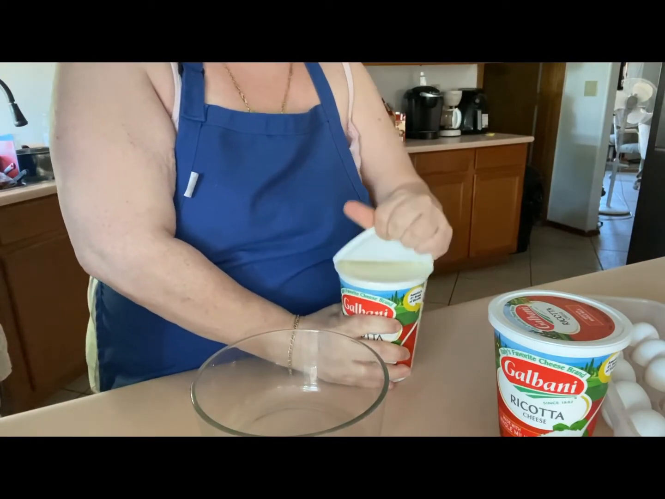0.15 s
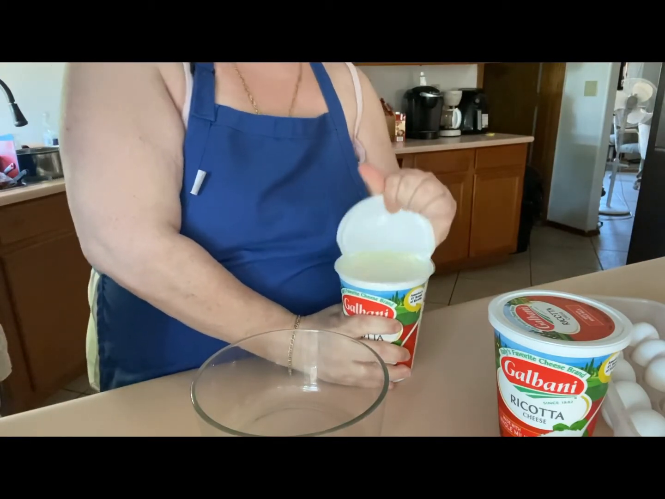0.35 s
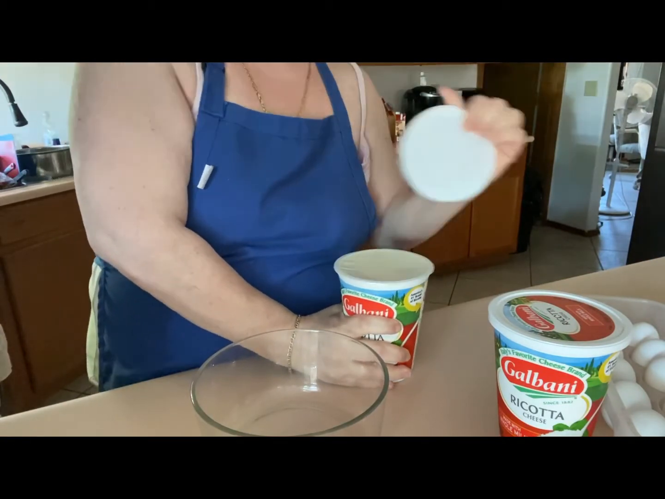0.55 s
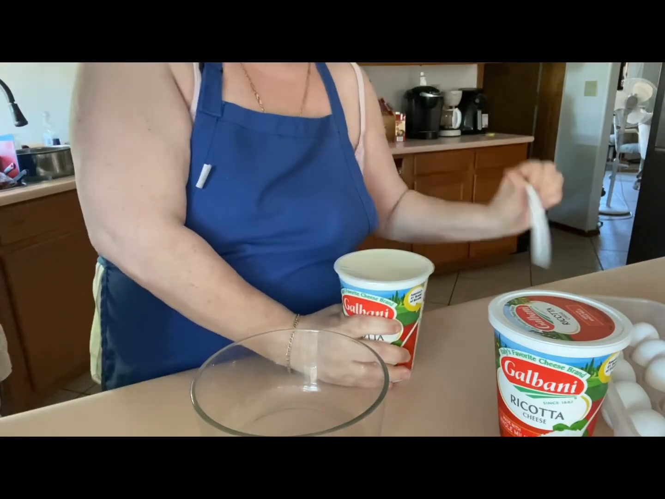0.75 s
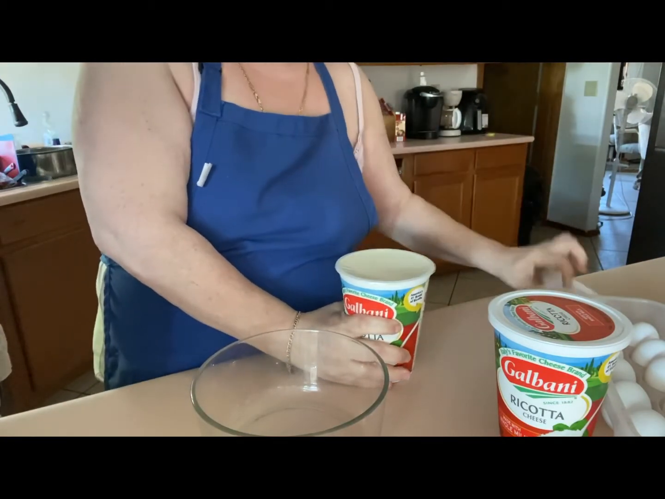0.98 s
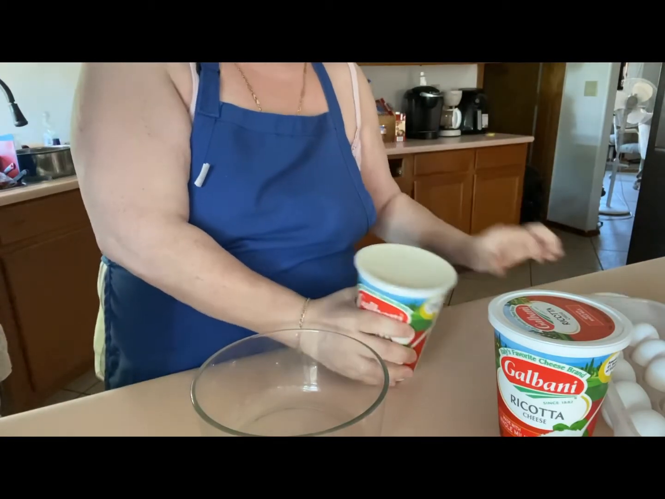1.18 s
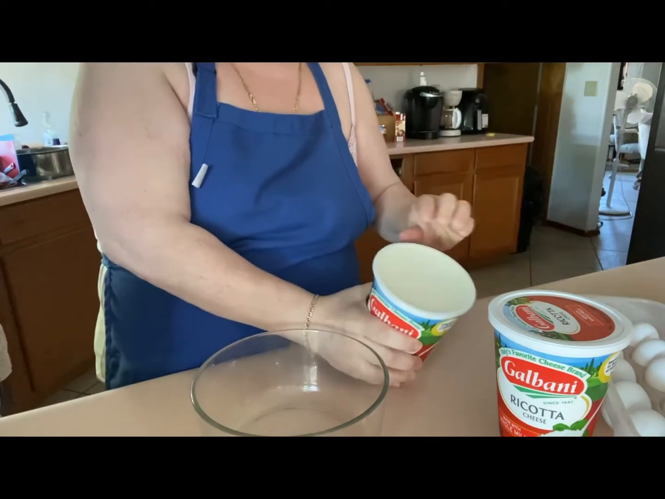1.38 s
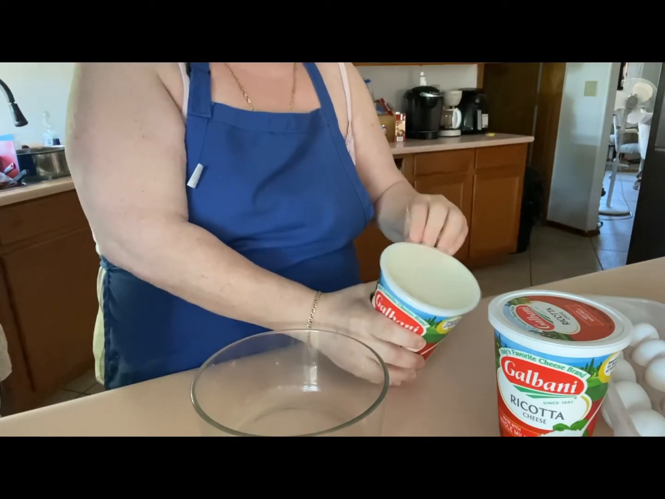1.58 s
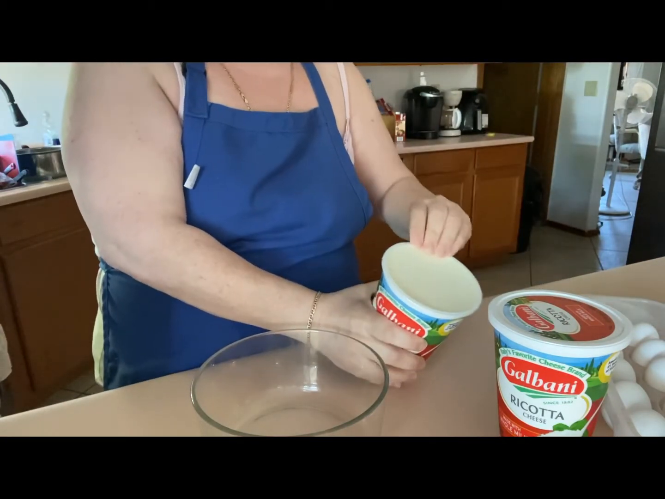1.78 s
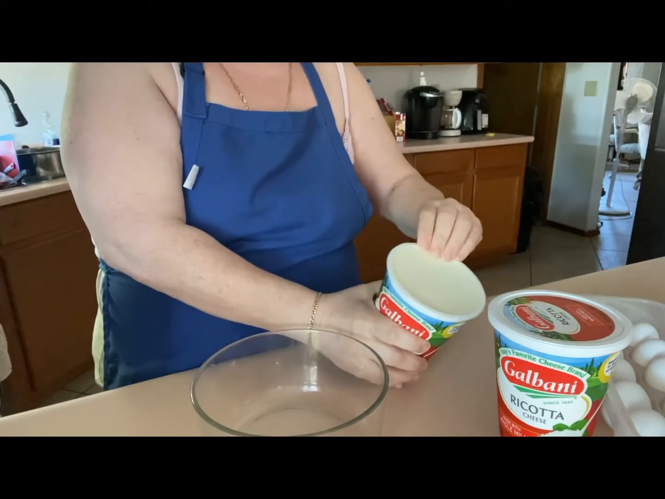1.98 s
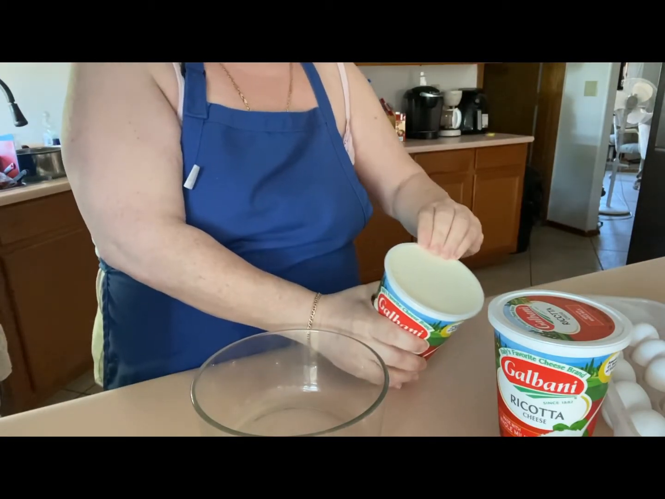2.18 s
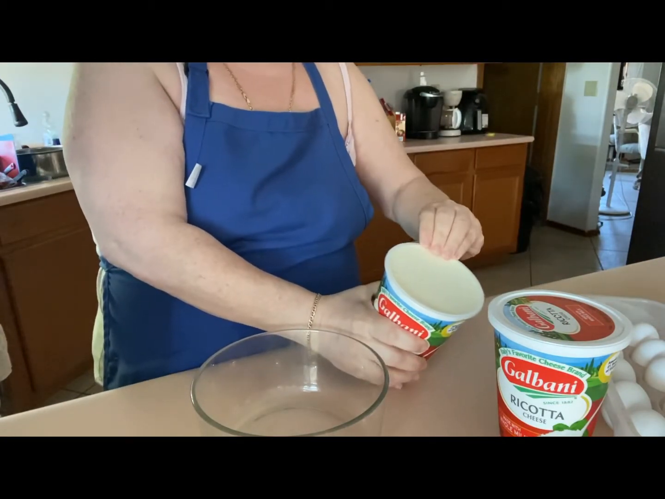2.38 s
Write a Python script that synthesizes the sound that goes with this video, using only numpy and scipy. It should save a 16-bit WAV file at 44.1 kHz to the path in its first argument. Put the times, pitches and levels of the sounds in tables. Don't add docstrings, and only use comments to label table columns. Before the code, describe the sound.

Plastic tub lid creaks, pops loose loudly, lands flat on a counter and rattles to rest

```python
import sys
import numpy as np
from scipy import signal
from scipy.fft import rfft, irfft, next_fast_len
from scipy.io import wavfile
from scipy.ndimage import uniform_filter1d

SR = 44100
rng = np.random.default_rng(int(sys.argv[2]) if len(sys.argv) > 2 else 0)


def put_to_file(sound):
    columns = np.atleast_2d(sound).T
    safe = np.clip(columns, -1, 1)
    whole_steps = np.round(safe * 32767)
    wavfile.write(sys.argv[1], SR, whole_steps.astype(np.int16))


def voltage_ratio(level):
    return 10 ** (np.asarray(level, float) / 20)


N = 108045

SIZE = next_fast_len(2 * N)
HZ = np.maximum(np.arange(SIZE // 2 + 1) * SR / SIZE, 1)
T = np.arange(N) / SR

# f/Hz, level/dB per Hz
AIR_SPECTRUM_DB = [(25, -12), (48, 2.5), (150, -4.5), (280, 2), (550, -7.5), (1000, -18.5), (1500, -30.5),
                   (11000, -43), (13000, -61)]
# f/Hz, share/0-1
AIR_LIKENESS = [(100, .95), (290, .62), (640, .05), (3000, 0.66), (7000, 0.3)]
# f/Hz, width/Hz, level/dB
FRIDGE_HUMS = [(119, 17, -70), (246, 38, -74), (298, 17, -70.5), (354, 9.1, -78), (536, 4, -74.5)]
# f/Hz, t60/s
ROOM_T60_S = [(100, 0.67), (400, 0.33), (1000, 0.58), (2000, 0.64), (4000, 0.58), (8000, 0.54),
              (11000, 0.32), (14000, .15)]
# f/Hz, level/dB
ROOM_LEVEL_DB = [(100, -10.5), (400, -1.5), (1000, -7), (2000, -8), (4000, -8), (8000, -15), (11000, -8),
                 (14000, -12)]
# f/Hz, share/0-1
ROOM_LIKENESS = [(130, 0.93), (290, 0.95), (640, 0.4), (3000, 0.6), (7000, 0.1)]
# f/Hz, phase/rad
PORT_PHASE_RAD = [(100, 0), (2300, -.65), (4000, -.2), (7000, -.4), (9500, -1.4), (12500, -2.55)]
# f/Hz, level/dB
AIR_BALANCE_DB = [(60, -1), (110, 1.5), (200, 2), (380, 7), (700, 4), (1290, 1.5), (2380, 4), (4400, 3.5),
                  (8120, -2.5), (15000, 2)]
COUNTER_BALANCE_DB = [(60, 0.488), (110, 1.0), (200, 2.2), (380, 4.5), (700, 3.0), (1290, 5.4), (2380, 2),
                      (4400, 1.5), (8120, 0.5), (15000, 0.39)]
TUB_BALANCE_DB = [(40, 0), (120, 1.7), (400, 4), (1500, 2), (8000, -1)]
# t/s, length/s, level/dB, centre f/Hz
BRUSHES = [
    (0.634, 0.022, -78, 8000),
    (0.741, 0.057, -78.5, 3500),
    (1.43, 0.059, -70.5, 8000),
    (1.462, 0.085, -73, 7690),
    (1.932, 0.057, -75.5, 8000),
]
# t/s, level/dB
LANDING = [
    (.81, -21.5),
    (.81072, -9),
]
# f/Hz, level/dB, t60/s
FLAT_MODES = [(375, 7, .07), (623, -7, 0.12), (888, 9.5, 0.027), (974, 8, 0.033), (1140, 21.5, .014),
              (1300, 12.5, 0.018), (1480, 16, 0.029), (1652, 5, 0.036), (1950, 2.5, 0.021),
              (2230, -15, .012)]
# t/s, level/dB
SQUEEZE_DB = [(.8085, -64), (.8105, -28), (.814, -42), (.84, -49), (.9, -54)]
# f/Hz, level/dB, t60/s
SQUEEZE_MODES = [(2340, 6, .004), (2870, -7, 0.003), (3900, 2, 0.0027), (4350, -6.5, 0.0017),
                 (5600, -11.5, .002), (6800, -2, 0.0015)]
# t/s, crack level/dB, body re crack/dB
BOUNCES = [(.752, -64, 8.5), (.800, -53, 6.5), (.9063, -18, -8.5), (.9078, -40.5, 7), (.970, -46, -11.5),
           (.9725, -38, -1), (.9745, -24.5, 5.5), (.9765, -27.5, 2), (.980, -37, 10), (1.0094, -46, 15.5),
           (1.1132, -26, -6), (1.122, -44.5, 12.5), (1.147, -39.5, -9), (1.157, -40, 9),
           (1.186, -47.5, 11.5)]
# f/Hz, level/dB, t60/s
EDGE_LOW_MODES = [(1372, -18, 0.015), (1557, -9, 0.015), (1790, -1, 0.01087), (1987, -3.5, .04),
                  (2290, -8, 0.013), (2580, -8, 0.013)]
EDGE_HIGH_MODES = [(3245, -7, 0.041), (3650, -9.5, 0.0045), (4270, 0, .005), (5180, -5, 0.002),
                   (6290, -5.5, 0.0038), (7450, -11.5, 0.0059), (9200, -10.5, 0.0028)]
# t/s, level/dB
ROCKING_DB = [(.907, -22.5), (.914, -33.5), (.925, -39.5), (.96, -43), (.98, -35.5), (1.0, -39.5),
              (1.1, -58), (1.13, -49), (1.19, -52.5), (1.25, -65.5), (1.5, -84)]
# t/s, level/dB
LIP_TICKS = [
    (.088, -55),
    (.1045, -48.5),
    (.1095, -43.5),
    (.1265, -48.5),
    (.1305, -48),
    (.1492, -40),
    (.2325, -48),
    (.2825, -36),
    (.8105, -44),
    (.9748, -39.5),
]
# f/Hz, level/dB, t60/s
LIP_MODES = [(6200, -6, .003), (7400, -4, .003), (10600, -2.5, .002), (12340, 1, .002), (14500, 1, .002)]
# t/s, crack level/dB, body re crack/dB
CREAKS = [(.002, -42.5, -12), (.0108, -41, -12), (.030, -51.5, 1.5), (.046, -48.5, -1.5),
          (.0615, -51, -6.5), (.1087, -41.5, -11), (.113, -46, -10), (.1232, -39, -1), (.1245, -44, 7.5),
          (.1263, -38, -0.5), (.130, -37.5, -9.5), (.1487, -36.5, -12), (.186, -53, -6), (.232, -51, -14.5)]
SNAPS = [(.2412, -39.5, 17.5), (.2499, -1.5, -7), (.2523, -1.5, -16), (.2553, -12, -8.5), (.259, -24, -8),
         (.273, -26.5, -13), (.283, -20, -21), (.2893, -11.5, -14.5), (.294, -24, -5.5),
         (.2984, -10, -14.5), (.2997, -14, -7), (.3006, -22, 11)]
# f/Hz, level/dB, t60/s
RIM_MODES = [(2970, -26, .001), (3850, -6, 0.004), (6160, -10, .004), (4340, -7, .002), (6165, -9, 0.0049),
             (6900, -1, 0.0027), (8600, -2, 0.0038), (10200, -8.5, 0.0029), (11343, -3, .002),
             (14900, -28.5, .002)]
WALL_MODES = [(674, -11, .012), (1300, -8, .008), (1460, -4, 0.0073), (1610, 1, 0.022), (1960, -6, .006),
              (2120, -7.5, .006), (920, -11.5, .01), (403, -23.5, 0.007)]
SIDE_MODES = [(1633, -3, 0.003), (2050, -0.5, 0.0038), (3000, -2.5, 0.00081), (4177, 2.5, 0.0023),
              (6300, -4.5, .002), (8000, -12, 0.0015)]
# t/s, level/dB
STRAIN_DB = [(0, -47.5), (.06, -55), (.13, -52.5), (.2, -63.5), (.24, -57), (.249, -52), (.256, -28),
             (.275, -45), (.3, -33), (.33, -74)]
# t/s, level/dB
FLEXES = [
    (0.023, -45.5),
    (0.101, -54),
    (0.137, -44.5),
    (0.162, -45),
    (0.256, -23),
    (.270, -14.5),
    (0.327, -25),
    (0.91, -43.5),
    (1.099, -53.5),
]
# f/Hz, level/dB, t60/s
SKIN_MODES = [(55.96, -13.5, 0.5), (64.2, -3.5, 0.42), (114.6, 2, 0.11), (124.8, -4.5, .25),
              (158, -16, .12), (220.2, 2, 0.033), (296.3, -14, 0.048)]


def over_hz(table):
    hz, value = np.array(table)[:, 0], np.array(table)[:, 1]
    return np.interp(np.log(HZ), np.log(hz), value)


def over_time(table):
    return voltage_ratio(np.interp(T, *np.array(table).T, left=-200, right=-200))


def band_at(centre_hz, centres_hz):
    return over_hz([(f, float(f == centre_hz)) for f in centres_hz])


def shape(x, gain):
    return irfft(rfft(x, SIZE) * gain, SIZE)[..., :N]


def low_pass(top_hz, order):
    return 1 / (1 + (HZ / top_hz) ** order)


def unit(x):
    return x / np.sqrt(np.mean(x ** 2))


def walk(rate_hz):
    k = int(SR / rate_hz)
    steps = np.repeat(rng.standard_normal(N // k + 1), k)
    return unit(uniform_filter1d(uniform_filter1d(steps, k), k)[:N])


def pair(likeness):
    c = np.clip(over_hz(likeness), 0, 1)
    mid, side = rng.standard_normal((2, N))
    mid = shape(mid, np.sqrt((1 + c) / 2))
    side = shape(side, np.sqrt((1 - c) / 2))
    return np.array([mid + side, mid - side])


def air():
    noise = unit(shape(pair(AIR_LIKENESS), voltage_ratio(over_hz(AIR_SPECTRUM_DB))))
    centres_hz = 30 * 2. ** np.arange(10)
    out = 0
    for hz in centres_hz:
        out = out + voltage_ratio(1.5 * walk(18)) * shape(noise, band_at(hz, centres_hz))
    return voltage_ratio(-60) * out


def fridge():
    out = 0
    for hz, width_hz, db in FRIDGE_HUMS:
        resonance = 1 / (1 + (2 * (HZ - hz) / width_hz) ** 2)
        out = out + voltage_ratio(db) * unit(shape(rng.standard_normal(N), resonance))
    whine_hz, whine_db, flutter_db = 3040 + 3 * walk(9.5), -84.5, 3.5
    whine = np.sin(2 * np.pi * np.cumsum(whine_hz) / SR)
    return out + voltage_ratio(whine_db + flutter_db * walk(25)) * whine


def room():
    noise, out = pair(ROOM_LIKENESS), 0
    centres_hz = [f for f, _ in ROOM_T60_S]
    for (hz, t60), (_, db) in zip(ROOM_T60_S, ROOM_LEVEL_DB):
        fade = voltage_ratio(-60 * T / t60)
        unit_energy = np.sqrt(2 * np.log(1000) / t60 / SR)
        out = out + voltage_ratio(db) * shape(noise, band_at(hz, centres_hz)) * fade * unit_energy
    onset = np.clip((T - .002) / .0022, 0, 1)
    return rfft(out * onset, SIZE) * low_pass(11300, 20)


def spread(x, evening):
    power = np.abs(rfft(x, SIZE)) ** 2 + 1e-12

    def smooth(width_hz):
        k = int(width_hz * SIZE / SR)
        return uniform_filter1d(uniform_filter1d(power, k), k)

    return shape(x, (smooth(900) / smooth(70)) ** (evening * np.clip(HZ / 1000, 0, 1) / 2))


def ports(x, balance_db):
    half = voltage_ratio(over_hz(balance_db) / 2) * np.exp(.5j * over_hz(PORT_PHASE_RAD))
    return shape(x, np.array([half, 1 / half]))


def ring(times_s, levels_db, modes, burst_s, scatter_db, cut_hz, crack_db=-60, detune=.02):
    hz, db, t60 = np.array(modes).T[:, :, None]
    size = max(int(t60.max() * SR), 512)
    out, t = np.zeros(N + size), T[:size]
    high_pass = signal.butter(2, cut_hz, "high", fs=SR, output="sos")
    for at_s, level_db in zip(times_s, levels_db):
        weight, shift = rng.standard_normal((2, len(hz), 1))
        partials = np.sin(2 * np.pi * hz * (1 + detune * shift) * t) * voltage_ratio(-60 * t / t60)
        tone = np.sum(voltage_ratio(db + scatter_db * weight) * partials, axis=0)
        tone[0] = voltage_ratio(crack_db)
        push = t[:512] * np.exp(-t[:512] / burst_s)
        if cut_hz > 400:
            rough = rfft(push * rng.standard_normal(512))
            push = irfft(rough / np.abs(rough) ** .9) * (push > push.max() / 30)
        hit = signal.sosfilt(high_pass, signal.fftconvolve(tone, push)[:size])
        start = int(at_s * SR)
        out[start:start + size] += voltage_ratio(level_db) * hit / np.max(np.abs(hit))
    return out[:N]


def two_part(rows, high, low, burst_s, crack_db):
    s, db, body_db = np.array(rows).T
    crack = ring(s, db, high, burst_s, scatter_db=2.2, cut_hz=2000, crack_db=crack_db)
    return crack + ring(s, db + body_db, low, burst_s, scatter_db=2, cut_hz=420)


def grains(effort_db, modes, rate_hz, spread_db, crack_db):
    contacts = (rng.random(N) < rate_hz / SR) * rng.standard_normal(N)
    contacts = contacts * voltage_ratio(spread_db * rng.exponential(size=N))
    hz, db, t60 = np.array(modes).T[:, :, None]
    t = T[:4096]
    body = np.sum(voltage_ratio(db) * np.sin(2 * np.pi * hz * t) * voltage_ratio(-60 * t / t60), axis=0)
    body[0] = voltage_ratio(crack_db)
    contacts = unit(contacts) / np.sqrt(np.sum(body ** 2))
    out = signal.fftconvolve(contacts * over_time(effort_db), body)[:N]
    return shape(out, 1 / (1 + (500 / HZ) ** 4))


def brushes():
    out = 0
    for start_s, length_s, db, hz in BRUSHES:
        band = 1 / (1 + ((HZ / hz - hz / HZ) / .75) ** 4)
        hiss = unit(shape(rng.standard_normal(N), band))
        stroke = np.sin(np.pi * np.clip((T - start_s) / length_s, 0, 1))
        out = out + voltage_ratio(db + 2.5 * walk(52)) * hiss * stroke
    return out


def lid():
    s, db = np.array(LANDING).T
    knock = ring(s, db, FLAT_MODES, .00008, scatter_db=0, cut_hz=280, detune=0)
    squeeze = grains(SQUEEZE_DB, SQUEEZE_MODES, rate_hz=13000, spread_db=1.5, crack_db=-16)
    bounces = two_part(BOUNCES, EDGE_HIGH_MODES, EDGE_LOW_MODES, .00039, crack_db=12.5)
    rocking = grains(ROCKING_DB, EDGE_LOW_MODES + EDGE_HIGH_MODES, rate_hz=7800, spread_db=-3, crack_db=-13)
    return shape(knock + squeeze + bounces + rocking, low_pass(11500, 10))


def lip_ticks():
    s, db = np.array(LIP_TICKS).T
    return ring(s, db, LIP_MODES, .0002, scatter_db=1, cut_hz=4000, crack_db=4)


def skin_boom():
    s, db = np.array(FLEXES).T
    return ring(s, db, SKIN_MODES, .00076, scatter_db=5, cut_hz=63, detune=.004)


def tub_rim():
    creaks = two_part(CREAKS, RIM_MODES, WALL_MODES, .0001, crack_db=4)
    snaps = two_part(SNAPS, RIM_MODES, WALL_MODES, .00063, crack_db=-6.5)
    strain = grains(STRAIN_DB, SIDE_MODES + WALL_MODES[:2], rate_hz=3900, spread_db=1, crack_db=-4)
    return shape(creaks + snaps + strain, low_pass(15000, 20))


def scene():
    tail = room()
    background = ports(air() + fridge(), AIR_BALANCE_DB)
    tossed = lid()
    counter = ports(tossed + shape(spread(tossed, evening=.3), tail), COUNTER_BALANCE_DB)
    pried = tub_rim() + brushes()
    pried_wet = shape(spread(pried, evening=.95), tail)
    tub = ports(pried + lip_ticks() + pried_wet + skin_boom(), TUB_BALANCE_DB)
    return background + counter + tub


def roll_off(x):
    return signal.sosfilt(signal.butter(12, 16530, fs=SR, output="sos"), x)


def record(dry):
    bass_cut = 1 / (1 + (38 / HZ) ** 6)
    return roll_off(np.tanh(shape(dry, bass_cut)))


dry = scene()
out = record(dry)
put_to_file(out)
```